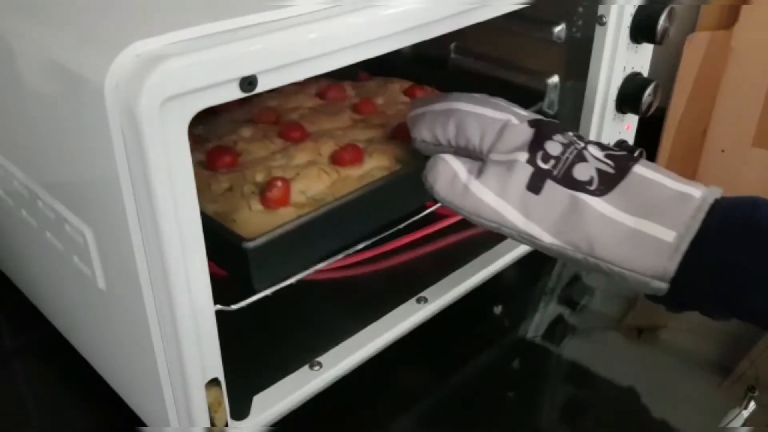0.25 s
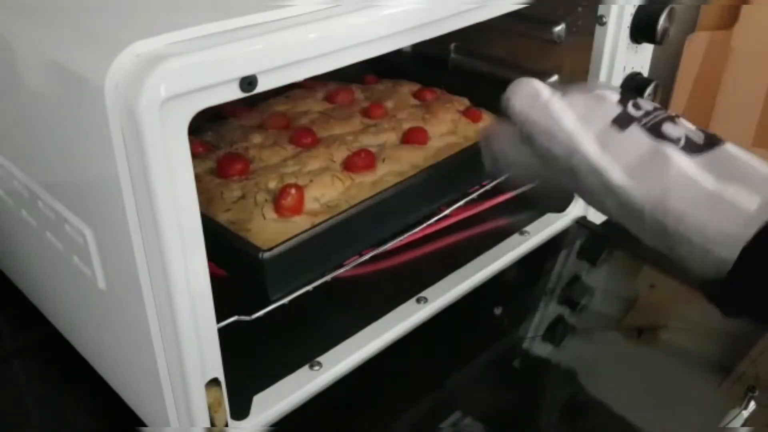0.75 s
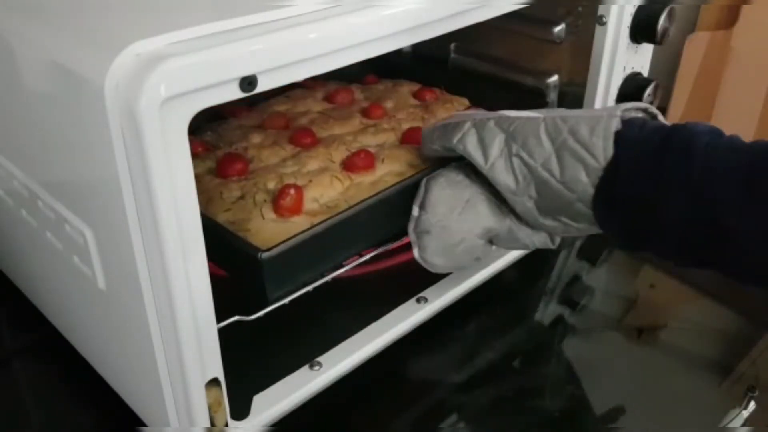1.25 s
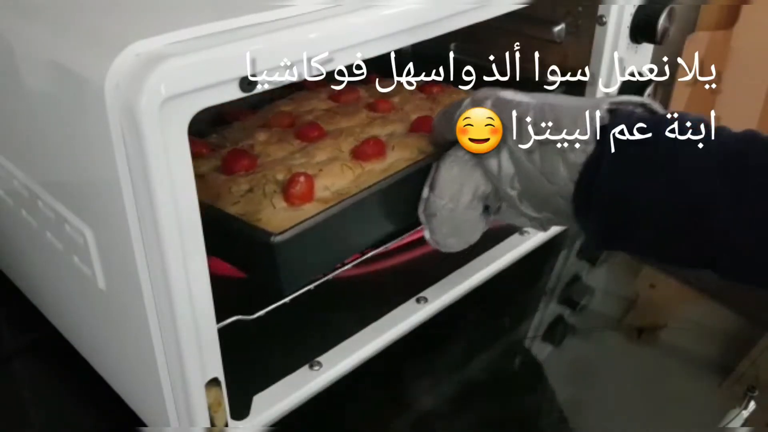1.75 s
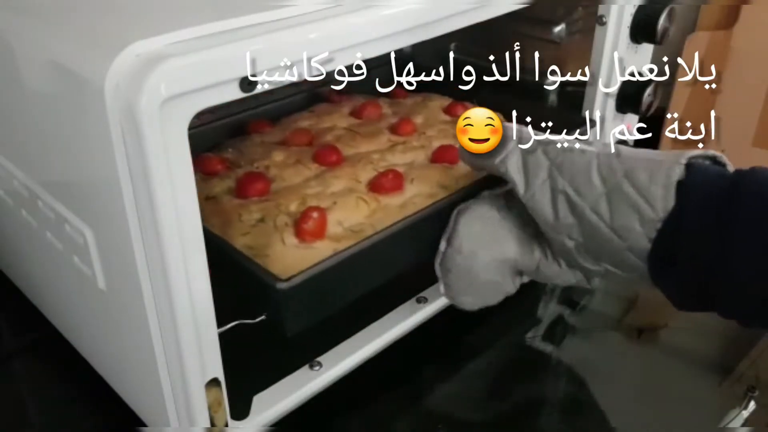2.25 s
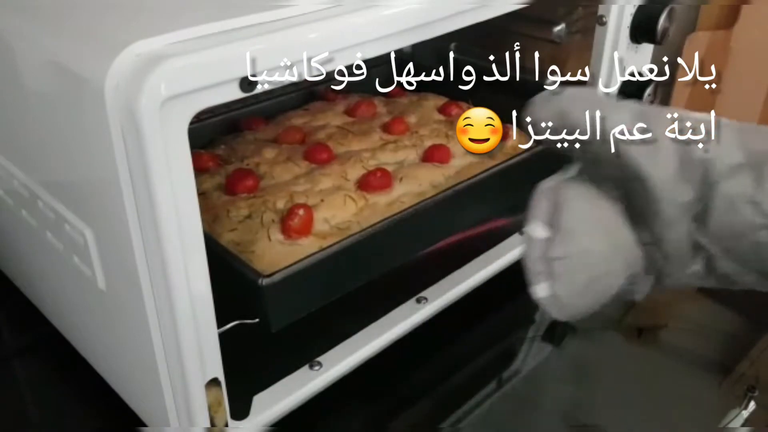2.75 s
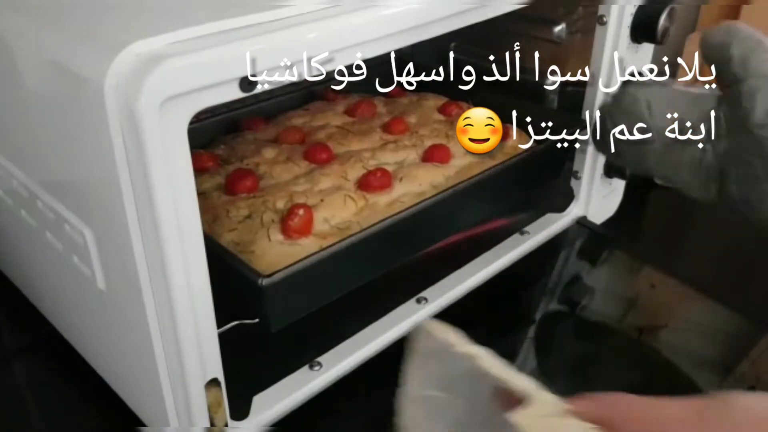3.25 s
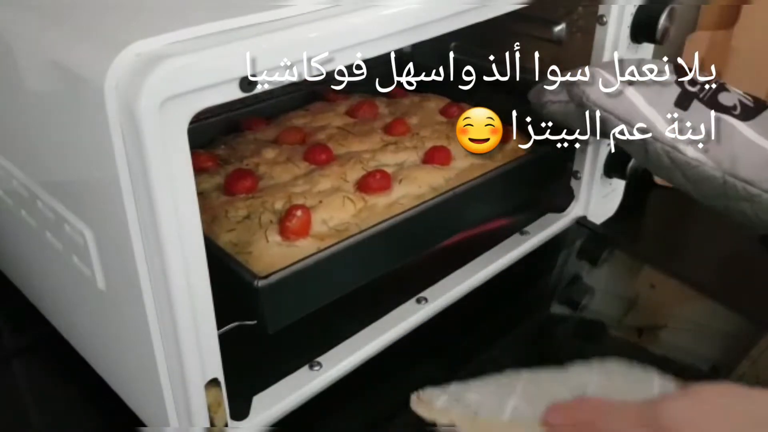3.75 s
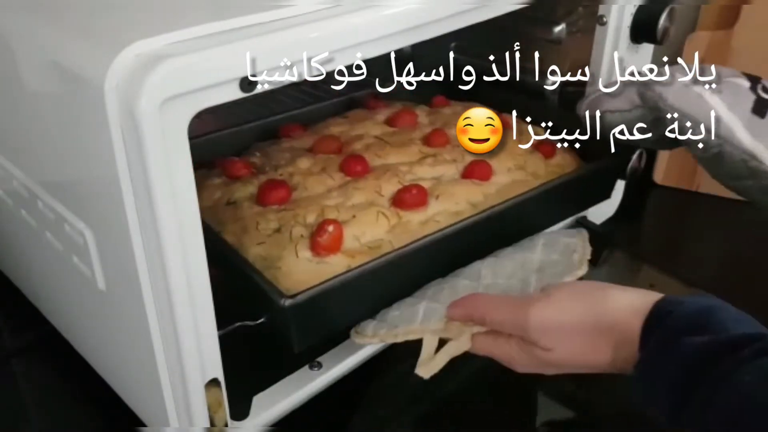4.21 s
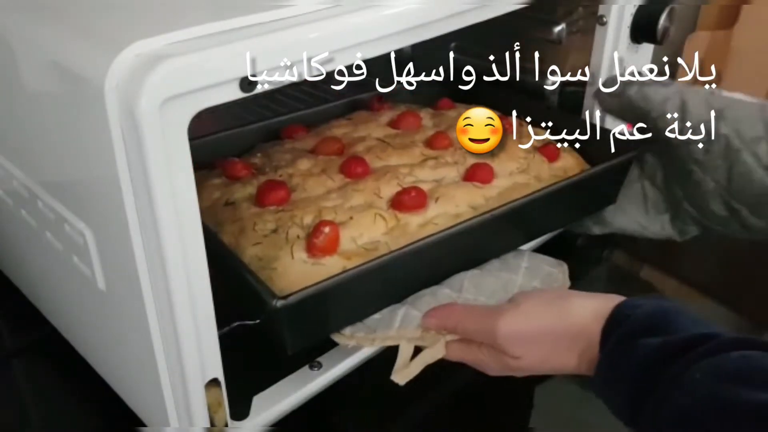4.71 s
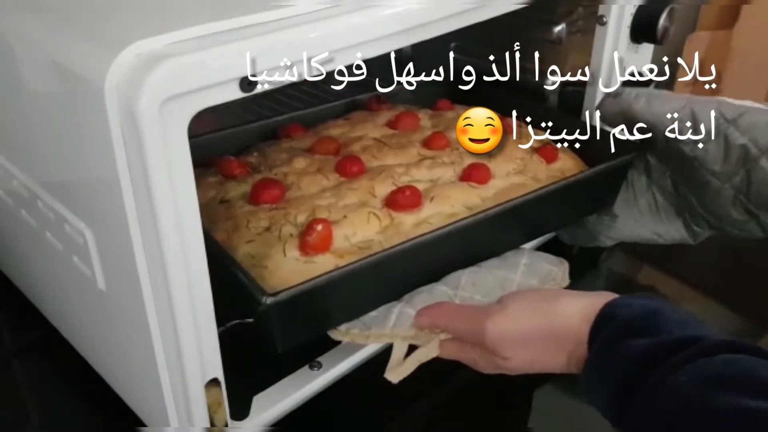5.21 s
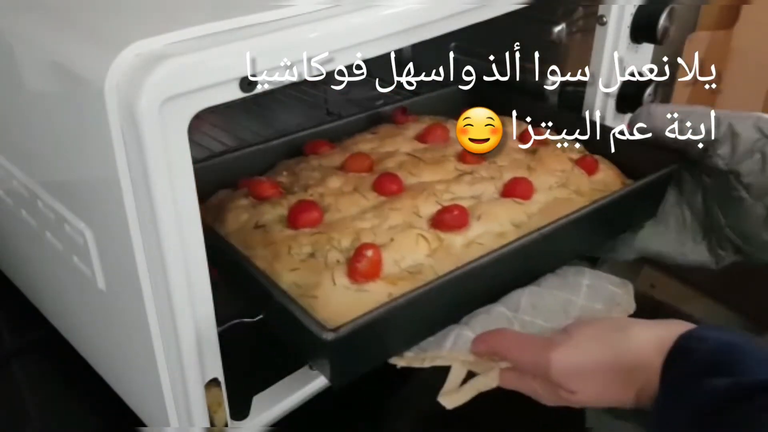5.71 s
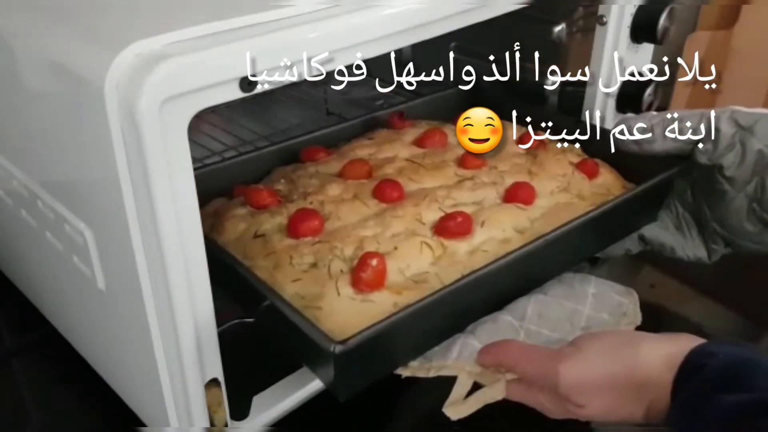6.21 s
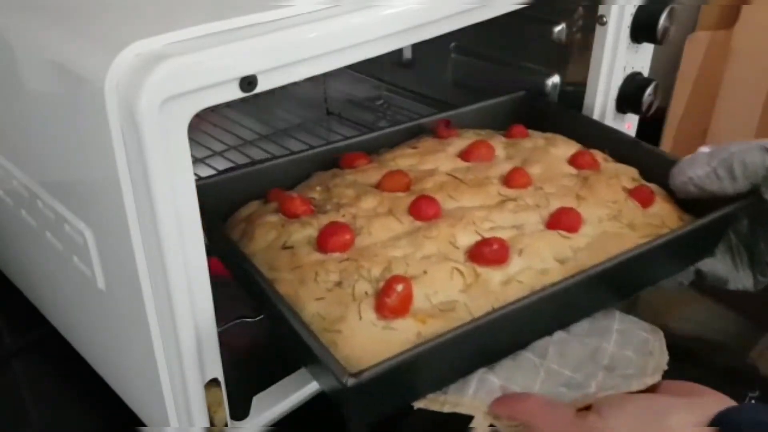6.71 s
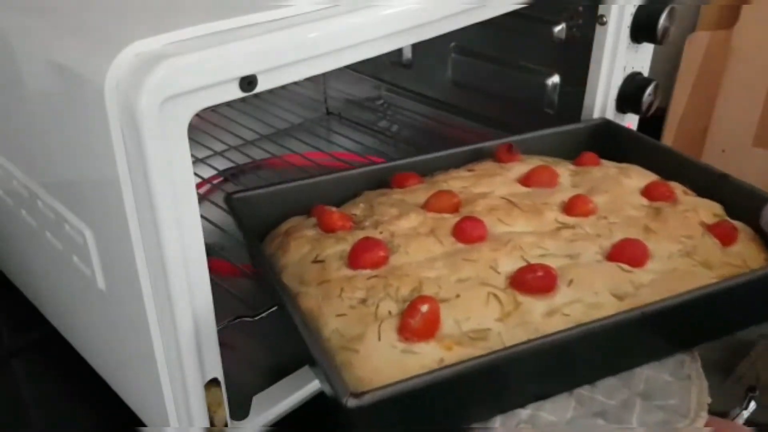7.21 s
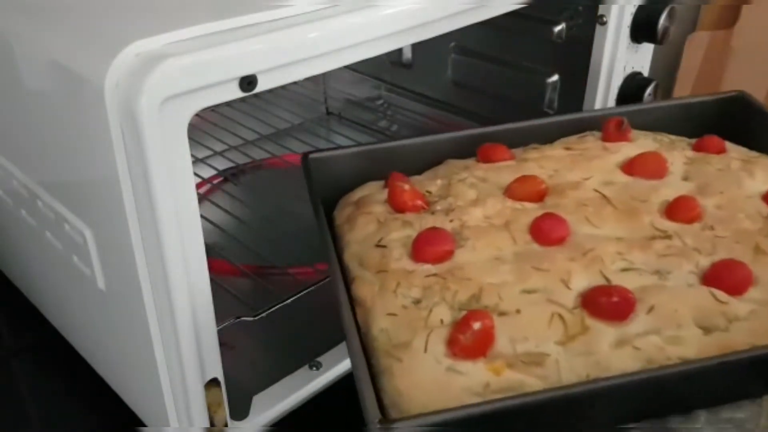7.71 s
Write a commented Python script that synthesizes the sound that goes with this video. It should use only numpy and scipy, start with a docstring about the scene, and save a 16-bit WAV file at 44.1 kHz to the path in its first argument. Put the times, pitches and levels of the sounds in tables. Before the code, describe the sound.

A quiet kitchen with low rumble, faint hum and slight hiss, heard close and leaning left. After a faint rub, two hard bright pan clanks strike at 0.25 s and ring briefly. Soft mitt cloth brushes around 0.7 s, then near quiet. At 1.6 s the pan grinds coarsely over the wire rack, with light ticks and a firm double knock at 2.03 s. From 2.7 s cloth rustles and metal scrapes; the thin oven casing jolts loudly at 3.25 s, hollow and rattling. Duller dragging comes at 3.8-4.2 s with a padded thud at 4.15 s, then a low casing boom at 4.55 s. Wires sing thinly at 5.2-5.6 s amid a scrape. After lighter rubs and a small squeal near 6.25 s, rough tugs and knocks run 6.4-7.2 s. Cloth brushes at 7.5 s; a dull low bump ends it at 7.88 s.

```python
"""In a home kitchen, a metal baking pan is worked out of a countertop oven with mitts.
It knocks and grates, the oven's door moves, and jolts shake the sheet-metal casing and the rack inside:
contact forces are convolved with modal and dense responses of the metal. Stick-slip friction through
narrow resonances makes wires sing, the rim squeal and the base grind; decaying sines and shaped noise give
thumps, bumps, clicks, squeaks and brushing cloth. A low rumble, faint hiss and two hums lie underneath."""
import sys
import numpy as np
from scipy import signal
from scipy.io import wavfile
from scipy.ndimage import map_coordinates

SR = 44100
rng = np.random.default_rng(int(sys.argv[2]) if len(sys.argv) > 2 else 0)


def bounce(signal):
    """Save signal as a 16-bit WAV file at the path given by the first command-line argument."""
    frames = np.transpose(np.atleast_2d(signal))
    limited = np.clip(frames, -1, 1)
    pcm = np.round(limited * 32767).astype(np.int16)
    wavfile.write(sys.argv[1], SR, pcm)


N = 351036


def from_db(db):
    """Decibel law: level to amplitude gain."""
    return 10 ** (np.asarray(db) / 20)


def rms_one(x):
    """Power normalization: scale to rms 1."""
    return x / np.sqrt(np.mean(x ** 2) + 1e-20)


def energy_one(x):
    """Energy normalization: a response so scaled passes white noise at equal level."""
    return rms_one(x) / np.sqrt(x.shape[-1])


def at_hz(points, hz):
    """Interpolation on a logarithmic frequency axis."""
    points = np.array(points)
    return np.interp(np.log(hz), np.log(points[:, 0]), points[:, 1])


def butter(x, hz, kind, order=2):
    """Causal Butterworth filtering: a maximally flat passband."""
    return signal.sosfilt(signal.butter(order, hz, kind, fs=SR, output="sos"), x + 1e-18)


def drift(rate_hz):
    """Low-passed random fluctuation with spread 1, drawn every 40 samples and interpolated."""
    r = np.exp(-80 * np.pi * rate_hz / SR)
    chance = rng.standard_normal(N // 40 + 2002)
    slow = signal.lfilter([1], [1, -2 * r, r * r], chance)[2000:]  # without the filter's start
    return np.interp(np.arange(N) / 40, np.arange(len(slow)), rms_one(slow))


def panned(x, left_db):
    """Interchannel level difference: the left side is set this much above the right."""
    return x * from_db([[left_db / 2], [-left_db / 2]])


def noise_bands(spectrum, likeness, balance, size, count):
    """Band analysis: yield (Hz, stereo noise), each band with its own level, coherence and balance."""
    edges = np.geomspace(24, 17400, count + 1)
    white = rng.standard_normal((2, 2, size + SR // 4))
    for k, (low, high) in enumerate(zip(edges, edges[1:])):
        hz = np.sqrt(low * high)
        settled = butter(white[k % 2], [low, high], "band", order=3)[:, -size:]
        mid, side = rms_one(settled) * np.sqrt(high - low)
        alike = np.clip(at_hz(likeness, hz), -1, 1)
        pair = np.sqrt(1 + alike) * mid + np.sqrt(1 - alike) * side * [[1], [-1]]
        yield hz, from_db(at_hz(spectrum, hz)) * panned(pair, at_hz(balance, hz))


# spectral shape of the room's rumble and hiss: (f/Hz, relative level per Hz/dB)
AIR_SPECTRUM = [(28, -12), (40, 10.5), (57, -0.5), (81, -0.5), (114, -2), (161, -5.5), (322, -10.5),
                (645, -19.5), (1290, -35), (2580, -45.5), (4200, -44.5), (7300, -44.5), (10300, -37),
                (14600, -38.5)]
# coherence of that noise: (f/Hz, left-right likeness)
AIR_LIKENESS = [(40, 1), (150, 0.93), (400, 0.6), (1200, 0.099), (6000, 0.052), (10000, 1), (16000, 0.92)]
# balance of that noise: (f/Hz, left minus right level/dB)
AIR_BALANCE = [(60, 10), (150, 7.5), (380, 5.5), (1000, 13.5), (6000, 11.3), (10000, 4.3), (15000, 1.7)]
# hums: (f/Hz, rms level/dB before wavering and panning)
HUM = [(77, -54.5), (258, -74)]


def background():
    """Superposition of broadband room noise and two hums that waver in level and phase."""
    bands = noise_bands(AIR_SPECTRUM, AIR_LIKENESS, AIR_BALANCE, size=N, count=19)
    air = rms_one(sum(band for hz, band in bands))
    t, hum = np.arange(N) / SR, 0
    for hz, level_db in HUM:
        gain = np.sqrt(2) * from_db(level_db + 2.1 * drift(7.9))
        hum = hum + gain * np.sin(2 * np.pi * hz * t + 1.16 * drift(2.5))
    return from_db(-44) * air + panned(hum, left_db=6.5)


def stroke(start, length, attack, release):
    """Envelope of one movement: linear rise, hold, then exponential decay by 60 dB over the release."""
    t = np.arange(N) / SR - start
    return np.clip(t / attack, 0, 1) * from_db(-60 * np.clip((t - length) / release, 0, 2))


def strokes(rows, attack, release):
    """Superposition of movement envelopes, each at its own level."""
    return sum(from_db(level_db) * stroke(start, length, attack, release)
               for start, length, level_db in rows)


def slips(per_s, spread_db, uneven_db):
    """Stick-slip friction: a random stream of impulses of unequal size that swells and thins; rms 1."""
    sizes = from_db(spread_db * np.minimum(rng.exponential(1, N), 4)) * rng.choice([-1, 1], N)
    happens = rng.random(N) < per_s / SR
    return rms_one(sizes * happens * from_db(uneven_db * drift(20.0)))


# mitt cloth brushing: (start t/s, length t/s, level/dB)
MITT = [(.68, 0.092, -59.5), (2.64, 0.21, -65.5), (2.85, 0.16, -63), (3.05, 0.041, -60),
        (3.98, 0.083, -58.5), (4.17, 0.057, -63), (7.52, 0.2, -59)]


def mitt():
    """Fibre friction: quilted cloth catches and slips in a fine crackle with an airy top."""
    fibres = np.array([slips(per_s=1800, spread_db=2.5, uneven_db=3.0) for side in range(2)])
    rustle = butter(fibres, [3000, 9000], "band", order=1)
    airy = butter(fibres.mean(axis=0), [9000, 13000], "band")
    hiss = rms_one(panned(rustle, left_db=14.5) + from_db(8.5) * airy)
    return hiss * strokes(MITT, attack=0.059, release=0.6) * from_db(1.4 * drift(9.1))


# tiny dry clicks: (t/s, relative level/dB, lowest f/Hz, t60/s)
CLICKS = [(0.769, -46.5, 3520, 0.028), (2.604, -45.5, 500, 0.0068), (2.857, -49, 7000, 0.06),
          (4.205, -50, 8000, 0.05)]


def clicks():
    """Transient noise: bursts decay exponentially and excite no resonance."""
    out, t = np.zeros((2, N + SR)), np.arange(SR // 10) / SR
    for s, level_db, lowest_hz, t60 in CLICKS:
        burst = rng.standard_normal((2, len(t))) * from_db(level_db - 60 * t / t60)
        at = int(s * SR)
        out[:, at:at + len(t)] += butter(burst, [lowest_hz, 13000], "band", order=1)
    return panned(out[:, :N], left_db=-9.0)


# short faint squeaks: (start t/s, length t/s, centre f/Hz, width f/Hz, relative level/dB)
SQUEAKS = [(0.05, 0.34, 1176, 200, -57.5), (2.913, 0.076, 3490, 120, -56), (3.067, 0.05, 1580, 200, -52),
           (4.004, 0.089, 12700, 900, -62)]


def squeaks():
    """Narrow-band friction noise: brief rubs swell and fade in one band."""
    out, t = np.zeros((2, N)), np.arange(N) / SR
    for s, length, hz, width, level_db in SQUEAKS:
        band = [hz - width / 2, hz + width / 2]
        rub = rms_one(butter(rng.standard_normal((2, N)), band, "band"))
        progress = np.clip((t - s) / length, 0, 1)
        swell = np.sin(np.pi * np.sqrt(progress))  # quick to catch, slow to let go
        out += rub * swell * from_db(level_db + 2.0 * drift(40))
    return panned(out, left_db=10)


def add_damped(out, s, level_db, t60, wave):
    """Exponential decay: add one second of a wave that dies by 60 dB in t60."""
    t, at = np.arange(SR) / SR, int(s * SR)
    out[at:at + SR] += wave * from_db(level_db - np.minimum(60 * t / t60, 200))


# dull padded bumps: (t/s, relative level/dB, f/Hz, t60/s)
BUMPS = [(4.1461, -23.5, 132, 0.061), (7.8759, -28, 254, 0.013)]


def bumps():
    """Damped oscillation: a padded bump is a dry decaying cosine, dulled by a low-pass."""
    out, t = np.zeros(N + SR), np.arange(SR) / SR
    for s, level_db, hz, t60 in BUMPS:
        add_damped(out, s, level_db, t60, np.cos(2 * np.pi * hz * t))
    return panned(butter(out[:N], 1460, "low"), left_db=6.0)


# coherence of the metal's sound: (f/Hz, left-right likeness)
METAL_LIKENESS = [(120, 0.7), (300, 0.9), (700, 0.45), (2000, 0.07), (7000, 0.05), (10000, 0.1),
                  (16000, 0.5)]
# balance of the metal's sound: (f/Hz, left minus right level/dB)
METAL_BALANCE = [(120, 8.4), (300, 3.5), (700, 7), (3000, 8.3), (7500, 11.7), (10000, 4), (16000, 1.2)]
# changing pressure bends rubbed resonances: they run early or late with this spread (s)
WAVER_S = .0001


def rubbed(resonances, per_s, flicker_db):
    """Friction-excited resonance: slips feed narrow bands that flicker singly and waver together; rms 1."""
    shared = slips(per_s, spread_db=0.0, uneven_db=0.5)
    apart = slips(per_s, spread_db=3.0, uneven_db=2.0)
    force, out = shared + 0.96 * apart * np.array([[1], [-1]]), 0
    for hz, width, level_db in resonances:
        r = np.exp(-np.pi * width / SR)
        section = [1, 0, -1, 1, -2 * r * np.cos(2 * np.pi * hz / SR), r * r]
        tone = rms_one(signal.sosfilt([section, section], force + 1e-18))  # twice, for steep skirts
        gain = from_db(level_db + flicker_db * drift(13.5))
        out = out + panned(tone, at_hz(METAL_BALANCE, hz)) * gain
    bent = np.arange(N) + WAVER_S * SR * drift(7.1)
    return rms_one(np.array([map_coordinates(side, [bent], order=3) for side in out]))


# slides that make the rack's wires sing: (start t/s, length t/s, level/dB)
SING = [(2.915, 0.16, -61), (4.0, 0.065, -63), (5.215, 0.032, -54.5), (5.36, 0.15, -55),
        (5.55, 0.16, -57.5)]
# slides that make the pan's rim squeal: (start t/s, length t/s, level/dB)
SQUEALS = [(6.268, 0.058, -61.5)]
# slides that make the pan's base grind: (start t/s, length t/s, level/dB)
GRINDS = [(1.64, 0.11, -44.5), (3.08, 0.15, -65), (6.63, 0.2, -67), (6.9, 0.064, -58), (7.07, 0.18, -61.5)]
# resonances of the rubbed wires: (f/Hz, width f/Hz, relative level/dB)
WIRES = [(1290, 46, -3), (1435, 44, -1), (1540, 47, 6), (1666, 60, -2), (2000, 50, -12), (2220, 81, -2),
         (2400, 100, -3), (3250, 80, -3), (3720, 130, -9), (4260, 59, -10), (4525, 110, 1.5),
         (5400, 1800, 1), (1990, 1500, -1.5), (5980, 200, -3), (6700, 150, -4), (7870, 170, -2),
         (8150, 150, -5), (8900, 250, 2.5), (9140, 500, 7.5), (10000, 310, 4), (10700, 740, 3),
         (11600, 880, 5.5), (12900, 2400, 6)]
# resonances of the rubbed rim: (f/Hz, width f/Hz, relative level/dB)
RIM = [(3580, 120, -5), (3860, 220, -7), (4300, 260, -5), (4900, 1500, -5)]
# resonances of the rubbed base: (f/Hz, width f/Hz, relative level/dB)
BASE = [(1690, 130, 0), (2090, 190, 0.12), (2370, 140, 0), (2660, 220, -1)]


def slides():
    """Frictional excitation: sliding makes the rack's wires sing, the pan's rim squeal, its base grind."""
    sing = rubbed(WIRES, per_s=2500, flicker_db=2.0)
    squeal = rubbed(RIM, per_s=2500, flicker_db=1.5)
    grind = rubbed(BASE, per_s=700, flicker_db=3.0)
    out = sing * strokes(SING, attack=0.039, release=0.92)
    out += squeal * strokes(SQUEALS, attack=0.01, release=0.69)
    return out + grind * strokes(GRINDS, attack=0.061, release=0.31)


# knocks of the pan, and a last dull bump: (t/s, strength level/dB, then bass, bite and treble
# relative level/dB, chatter t/s, struck spot's f/Hz, its level/dB before panning, its t60/s)
KNOCKS = [(0.2395, 13.5, -4, -10, -8, 0.004, 366, -25.5, 0.047),
          (0.2835, 16.5, -2, -2.5, -4.5, 0.0081, 1440, -23, 0.12),
          (1.657, 0, 7, 2.5, -6, 0.022, 2224, -49, 0.4), (2.0235, 10.5, -5, 0, -1, 0.0048, 407, -28.5, 0.3),
          (2.043, 10.5, 5.5, -3.5, -1.5, 0.0088, 854, -25, 0.073),
          (2.777, -25, -6, -2, -6, 0.008, 2030, -51.5, 0.068),
          (4.144, 0.5, 10.5, -11, -31, 0.0026, 974, -29, 0.057),
          (5.538, -7.5, -20, -2, -9, 0.003, 1320, -42, 0.12),
          (6.21, -10, -20, -40, -23, 0.0102, 125, -36.5, 0.17),
          (6.578, -2.5, 1, -2.5, -1.5, 0.0055, 2000, -42, 0.031),
          (6.884, -2, -6, -5.5, -22, 0.0031, 2760, -52, 0.12),
          (6.988, 2.5, 0.5, -1.5, -9.5, 0.002, 2380, -38, 0.073),
          (7.875, -3.5, 8, -11, -20, 0.0013, 110, -28, 0.086)]
# jolts of the oven's door and casing: (t/s, strength level/dB, then bass, bite and treble
# relative level/dB, chatter t/s, struck spot's f/Hz, its level/dB before panning, its t60/s)
JOLTS = [(2.914, -8, 5, 6.5, 1, 0.044, 1508, -48.5, 0.64), (3.232, 14, -5, -1, -8, .014, 1266, -36.5, 0.56),
         (3.292, 9, -0.5, 0, -5.5, .045, 219, -34, 0.16),
         (4.548, -1.5, 11.5, -31, -9.5, .018, 245.8, -32.5, 0.58),
         (5.214, -11, 10, -12, -8, 0.044, 257.3, -44.5, 0.86)]


def thumps():
    """Damped local vibration: each struck spot swings at one pitch and decays exponentially."""
    out, t = np.zeros(N + SR), np.arange(SR) / SR
    for s, *contact, hz, level_db, t60 in list(KNOCKS) + list(JOLTS):
        add_damped(out, s, level_db, t60, np.sin(2 * np.pi * hz * t))
    return panned(out[:N], left_db=9.0)


# dense upper modes of the metal: (f/Hz, relative level per Hz/dB)
METAL = [(60, -3), (100, -1.5), (145, -6), (180, -8), (270, -1), (400, -1), (490, -3), (640, -4.5),
         (850, -4), (1100, -6.5), (1400, -7), (1750, -9), (2250, -8), (3000, -12.5), (6000, -21.5),
         (8000, -20.5), (10300, -13), (15000, -27)]


def dense_ring(t60_table, rise):
    """Statistical modal overlap: noise bands build up, then decay at their own rates."""
    t, out = np.arange(SR) / SR, 0
    for hz, band in noise_bands(METAL, METAL_LIKENESS, METAL_BALANCE, size=SR, count=38):
        fading = band * (1 - np.exp(-t / rise)) * from_db(-60 * t / at_hz(t60_table, hz))
        out = out + rms_one(fading) * np.std(band)
    return energy_one(out)


# bent sheet and wire split every mode in two: twin's relative level/dB, greatest detuning (share of pitch)
TWIN_DB, TWIN_DETUNE = -7.5, 0.012


def modal_ring(modes):
    """Modal superposition: modes beat with weaker twins; less coherent ones differ in phase by side."""
    t, out = np.arange(SR) / SR, 0
    chances = rng.uniform(-0.99, 1, (len(modes), 3))
    for (hz, level_db, t60), (phase, skew, split) in zip(modes, chances):
        apart = skew * np.clip(1 - at_hz(METAL_LIKENESS, hz), 0, 1)
        angle = np.pi * (2 * hz * t + phase + np.array([[0], [apart]]))
        twin = np.sin(angle + 2 * np.pi * hz * TWIN_DETUNE * split * t)
        wave = np.sin(angle) + from_db(TWIN_DB) * twin
        out = out + panned(wave, at_hz(METAL_BALANCE, hz)) * from_db(level_db - 60 * t / t60)
    return energy_one(out)


def excite(force, response):
    """Linear superposition: a driven body sounds as force convolved with response."""
    return signal.fftconvolve(force[None], response, axes=1)[:, :N]


def below(x, hz):
    """Zero-phase low-pass filtering."""
    return signal.sosfiltfilt(signal.butter(2, hz, fs=SR, output="sos"), x + 1e-18)


# borders of bass, middle, bite and treble
BASS_HZ, BITE_HZ, TREBLE_HZ = 352, 1246, 4630


def contact_colour(bass, middle, bite, treble):
    """Contact stiffness: heavy soft contacts push in the bass, hard light ones in the treble."""
    out = treble + below(bite - treble, TREBLE_HZ)
    return out + below(middle - bite, BITE_HZ) + below(bass - middle, BASS_HZ)


# a contact that chatters longer sets the body ringing more
BRIEF_CHATTER_S, RING_DB_PER_DOUBLING = 0.0041, 1.59


def blows(rows, rebound_db, ring_db):
    """Impulsive excitation: a burst of rebounds at the contact, and one net push that rings the body."""
    near, ringing = np.zeros((2, 4, N + SR))
    chances = rng.random((len(rows), 2, 9))
    for (s, level_db, bass_db, bite_db, treble_db, chatter, *spot), chance in zip(rows, chances):
        when = (np.arange(9) + chance[0]) / 9
        sizes = from_db(rebound_db * when) * np.sign(chance[1] - .5)
        at = ((s + chatter * (when - when[0])) * SR).astype(int)
        push = from_db(level_db + np.array([bass_db, 0, bite_db, treble_db]))
        near[:, at] += np.outer(push, sizes / np.linalg.norm(sizes))
        longer_db = RING_DB_PER_DOUBLING * np.log2(chatter / BRIEF_CHATTER_S)
        ringing[:, at[2]] += push * from_db(ring_db + longer_db)
    return contact_colour(*near[:, :N]), contact_colour(*ringing[:, :N])


# tugs that drag the pan over the rack or move the oven's door: (start t/s, length t/s,
# friction level/dB, weight as bass relative level/dB, hardness as bite relative level/dB,
# lean on casing rather than pan, level/dB)
TUGS = [(-0.05, 0.097, -49.5, 18.5, 10, 5), (0.097, 0.14, -50, -7, -9, 3), (0.655, 0.15, -67, 4, 8, -2),
        (1.04, 0.38, -70.5, 14, 9, 5), (1.594, 0.26, -40.5, 5, 0, -1), (1.866, 0.046, -40, -7, -19, -11),
        (2.128, 0.17, -49.5, 18.5, 11, -3), (2.723, 0.22, -54.5, 13, 7.5, 3), (2.87, 0.13, -38, -9, -15, 8),
        (3.012, 0.052, -35.5, 0, -9, 18), (3.076, 0.14, -36, 2, -9.5, 4),
        (3.308, 0.16, -40.5, 2.5, 3, 11.5), (3.797, 0.19, -45, 12.5, -27, -4),
        (3.973, 0.29, -43, 9, -21, 7), (4.926, 0.038, -55.5, 17.5, 0.5, 8.5),
        (5.216, 0.28, -49, 12.5, -2.5, 7.5), (5.517, 0.16, -36.5, 8.5, -6, 8),
        (5.734, 0.11, -50.5, 19.5, -11, 10.5), (6.044, 0.18, -50.5, 17.5, 1, 1),
        (6.438, 0.16, -46, 11.5, -11, 7), (6.598, 0.2, -38, 8, -8.5, -4), (6.912, 0.15, -37, 7.5, -16, 4.5),
        (7.086, 0.14, -37.5, 7, -6.5, -2), (7.233, 0.23, -83, 14, 25.5, 3)]
# a tug builds up, holds and lets go, falling 60 dB over the release
TUG_ATTACK_S, TUG_RELEASE_S = 0.039, 0.46
# hard contact brightens the treble in step with the bite (dB per dB, and dB at no hardness)
TREBLE_PER_HARDNESS, TUG_TREBLE_DB = 1.42, -6.5


def dragging():
    """Stick-slip force of the tugged pan or door, coarse with a fine hiss, and its lean on the casing (dB)."""
    push, lean = np.zeros((4, N)), np.zeros(N)
    for start, length, friction_db, weight_db, hard_db, casing_db in TUGS:
        treble_db = TUG_TREBLE_DB + TREBLE_PER_HARDNESS * hard_db
        colour_db = np.array([weight_db, 0, hard_db, treble_db])
        movement = stroke(start, length, TUG_ATTACK_S, TUG_RELEASE_S)
        tug = np.outer(from_db(friction_db + colour_db), movement)
        push += tug
        lean += casing_db * tug[1]
    coarse = slips(per_s=450, spread_db=4.0, uneven_db=3.5)
    fine = slips(per_s=5000, spread_db=2.0, uneven_db=1.5)
    mean_lean_db = lean / (push[1] + 1e-18)  # overlapping tugs count by their force
    return contact_colour(*push[:3] * coarse, push[3] * fine), mean_lean_db


# light sharp ticks of the rack's wires: (t/s, strength level/dB, chatter t/s)
TICKS = [(1.868, -7.5, 0.015), (2.108, -5, 0.012), (2.189, -14.5, 0.015), (3.802, -28, 0.023)]
# what all ticks share: (bass, bite, treble relative level/dB)
TICK_TOUCH = (2, 0, 9.4)
# modes of the pan: (f/Hz, relative level/dB, t60/s)
PAN = [(141.1, -1, 1), (308, 3.5, 0.8), (338.4, 6.5, 0.95), (416, 9, 0.4), (485, 12, 0.3), (682, 1, 0.6),
       (838, 8, 0.35), (873, 10, 0.3), (1071, 3, 0.6), (1168, 11, 0.27), (1316, -2, 0.5), (1450, 13, 0.22),
       (1520, 2, 0.51), (1588, 6, 0.6), (1692, 6, 0.55), (1809, 1, 0.26), (1928, 7, 0.2), (2040, 9, 0.27),
       (2170, 3, 0.45), (2270, 7, 0.28), (2400, 4, 0.3), (2600, 6, 0.22), (3155, -5, 0.4), (4100, -3, .3),
       (4710, -9, 0.4), (5300, -8, 0.3), (6200, -13, 0.45), (9275, -2, 0.22), (9825, -5, 0.3)]
# modes of a flicked rack wire: (f/Hz, relative level/dB, t60/s)
RACK = [(483, 12.5, 0.84), (2830, 2, .25), (4550, -5, 0.33), (6200, -12, 0.12), (7951, -22, 0.35),
        (9652, -14, 0.21), (11100, -10, 0.23), (11780, -13, 0.28)]
# modes of the oven's casing and the rack inside it: (f/Hz, relative level/dB, t60/s)
CASING = [(146, -5, 0.82), (219, 4, 0.5), (258.8, 6.5, 0.58), (502, 1, 0.7), (527, -3, 0.5), (588, 0, 0.5),
          (822, -5, 0.68), (867, -3, 0.63), (1270, -4, 0.55), (1415, -14, 0.5), (1678, -8, 0.48),
          (1960, -12, 0.5), (2099, -6, 0.3), (2191, -9, 0.58), (2315, -7, 0.52), (2579, -10, 0.48),
          (2713, -10, 0.3), (2923, -12, 0.4), (3074, -14, 0.45), (3768, -14, 0.56), (3941, -16, 0.55),
          (4210, -18, 0.35), (4452, -12, 0.52), (4540, -14, 0.6), (6130, -23, 0.69), (8757, -14, 0.5),
          (8880, -15, 0.4), (9150, -13, 0.3), (9450, -11, 0.25), (9700, -12, .3), (10400, -15, .25),
          (11600, -12, 0.25)]
# ring-out of oven and kitchen: (f/Hz, t60/s)
RING_OUT = [(120, 1), (400, 0.85), (1500, 0.59), (4000, 0.54), (9000, 0.35), (16000, 0.18)]


def pan_and_oven():
    """Source-filter principle: blows and friction drive a short clack, metal modes and a long ring-out."""
    ticks = [(s, level_db, *TICK_TOUCH, chatter) for s, level_db, chatter in TICKS]
    knock, knock_ring = blows(KNOCKS, rebound_db=-3, ring_db=-2.5)
    tick, tick_ring = blows(ticks, rebound_db=-21, ring_db=-5.0)
    jolt, jolt_ring = blows(JOLTS, rebound_db=-27, ring_db=-2.5)
    drag, lean_db = dragging()

    clack = dense_ring([(120, 0.053), (1000, 0.26), (10000, 0.045)], rise=0.000095)  # (f/Hz, t60/s)
    contact = knock + tick + from_db(-9.5) * jolt + from_db(-0.5) * drag
    out = from_db(-7.5) * excite(contact, clack)

    net_push = knock_ring + tick_ring + from_db(3.3) * jolt_ring + drag
    out += from_db(-8.5) * excite(net_push, dense_ring(RING_OUT, rise=0.0028))

    on_pan = knock_ring + from_db(-8 - lean_db) * drag
    out += from_db(-8.5) * excite(on_pan, modal_ring(PAN))
    out += from_db(-2.0) * excite(tick_ring, modal_ring(RACK))
    on_casing = jolt_ring + from_db(-15.0 + lean_db) * drag
    return out + from_db(-6.0) * excite(on_casing, modal_ring(CASING))


def scene():
    """Superposition of all sources at the microphone."""
    out = background() + mitt() + clicks() + squeaks() + bumps()
    return out + slides() + thumps() + pan_and_oven()


def record(dry):
    """Band limitation: the microphone drops the deepest bass; an elliptic filter cuts the top steeply."""
    thinned = butter(dry, 52.3, "high", order=5)
    return signal.sosfilt(signal.ellip(10, .2, 80, 15900, fs=SR, output="sos"), thinned)


dry = scene()
out = record(dry)
bounce(out)
```